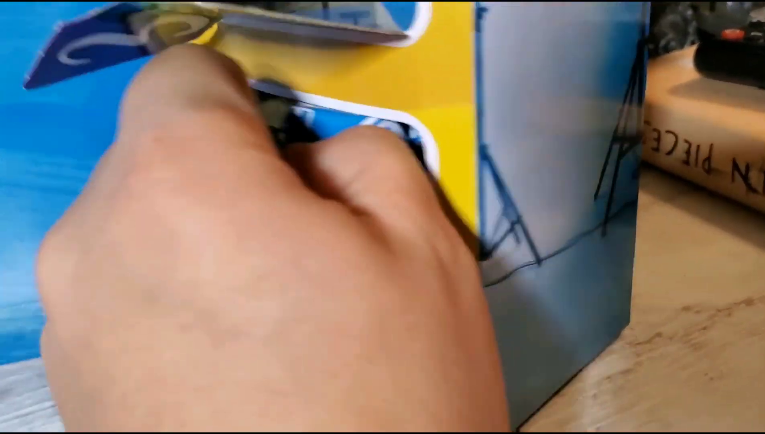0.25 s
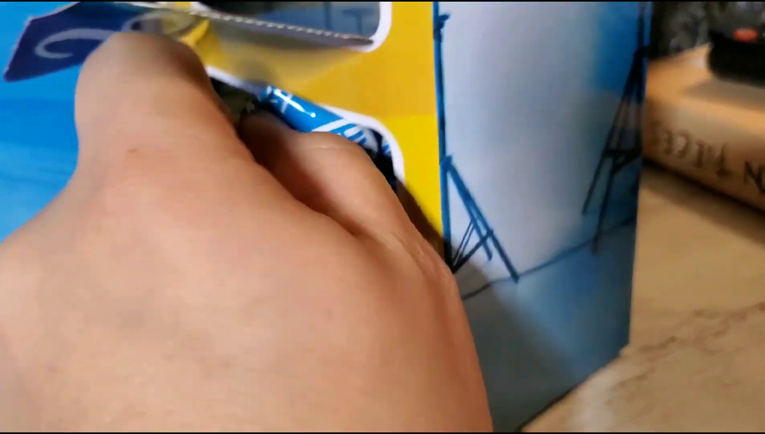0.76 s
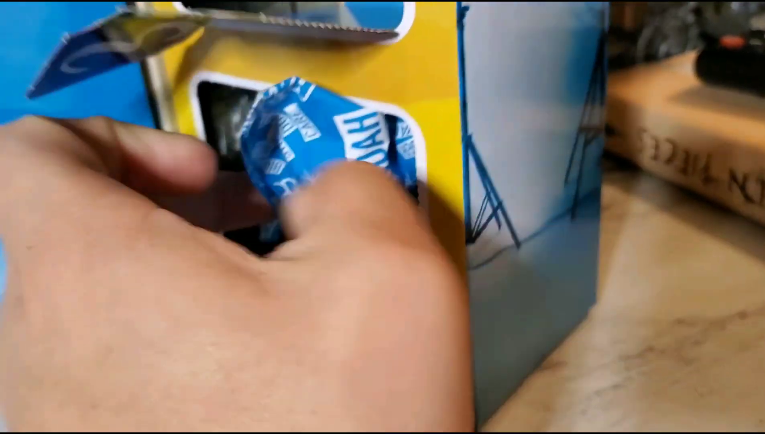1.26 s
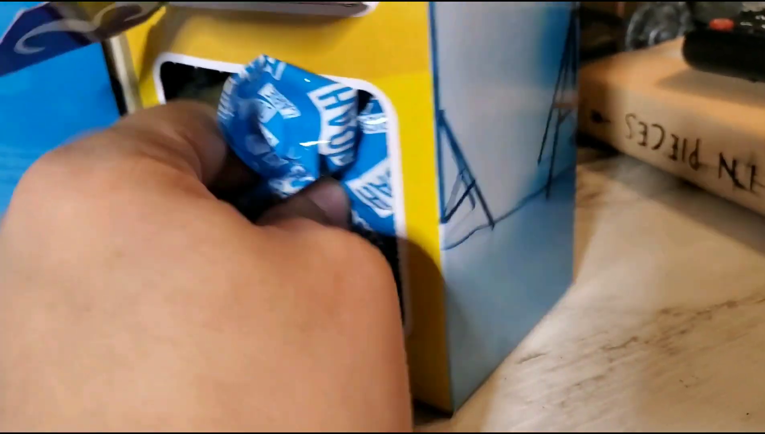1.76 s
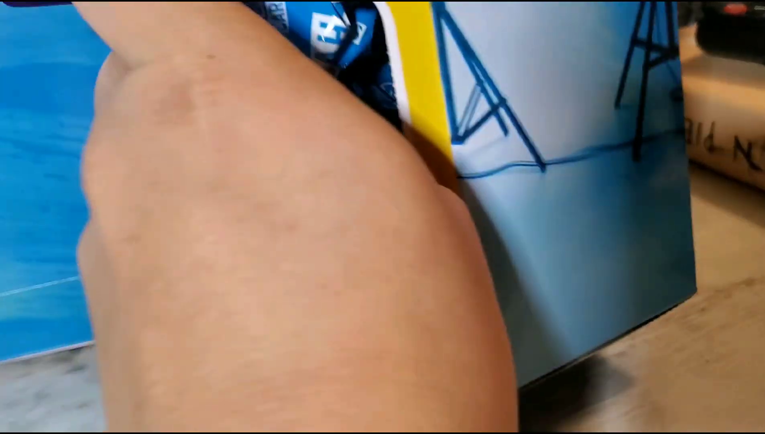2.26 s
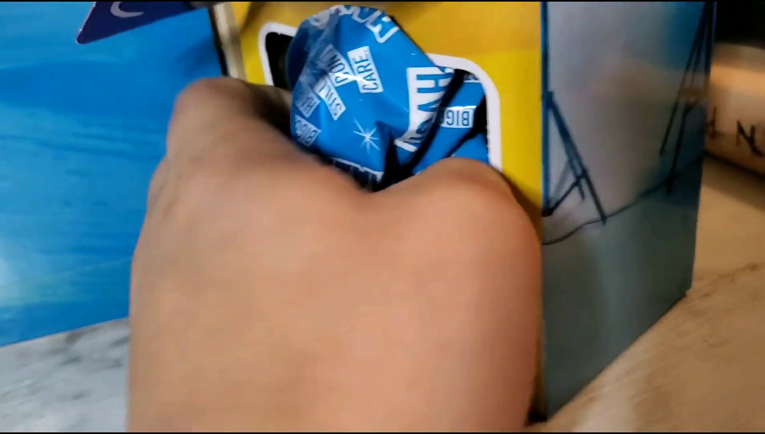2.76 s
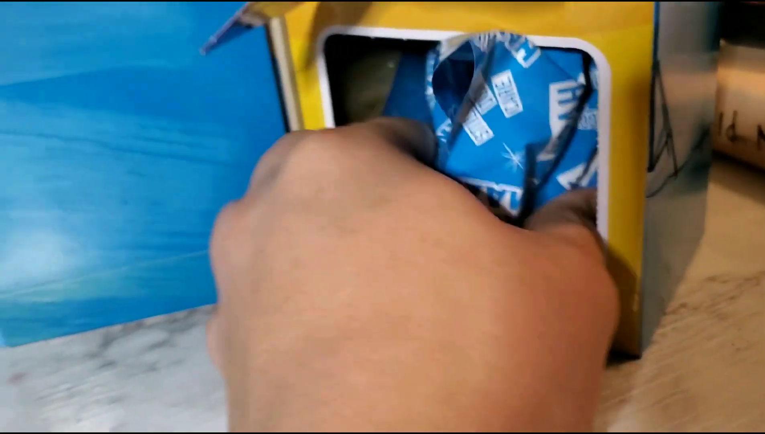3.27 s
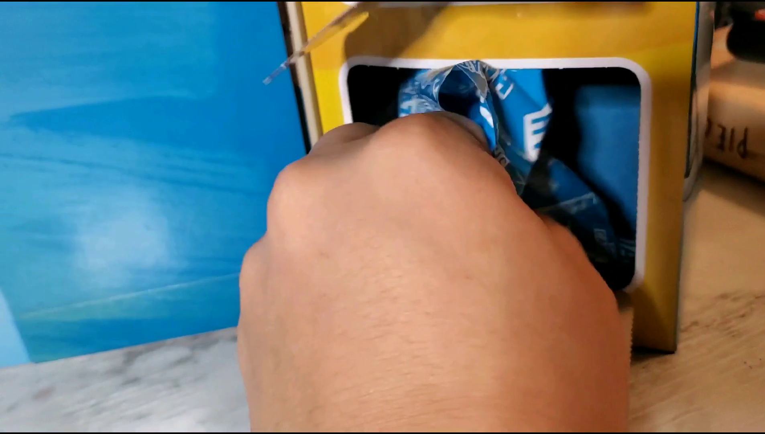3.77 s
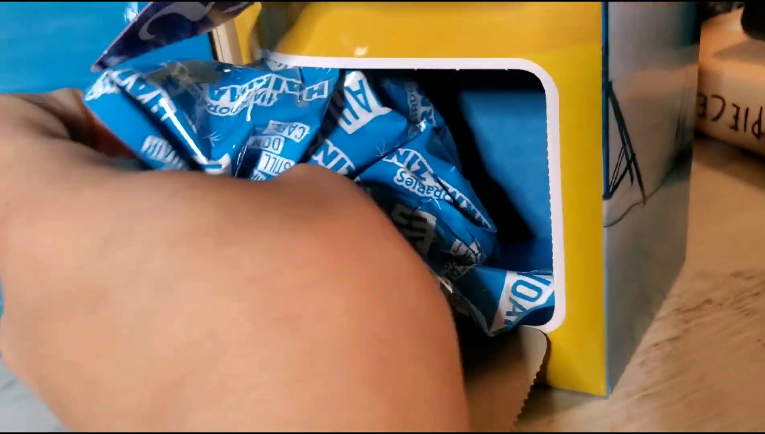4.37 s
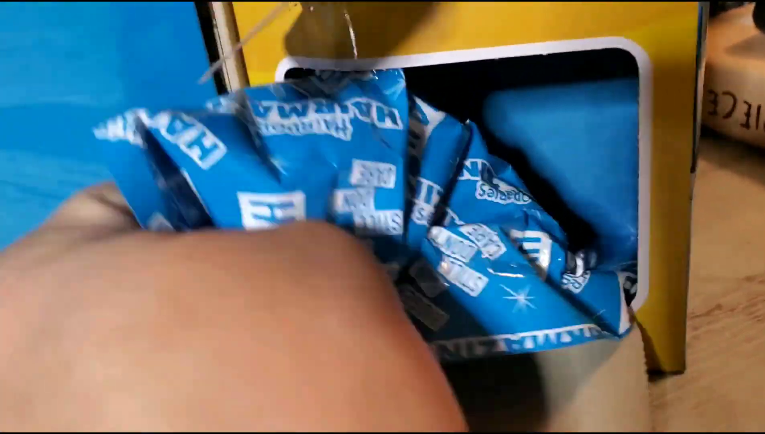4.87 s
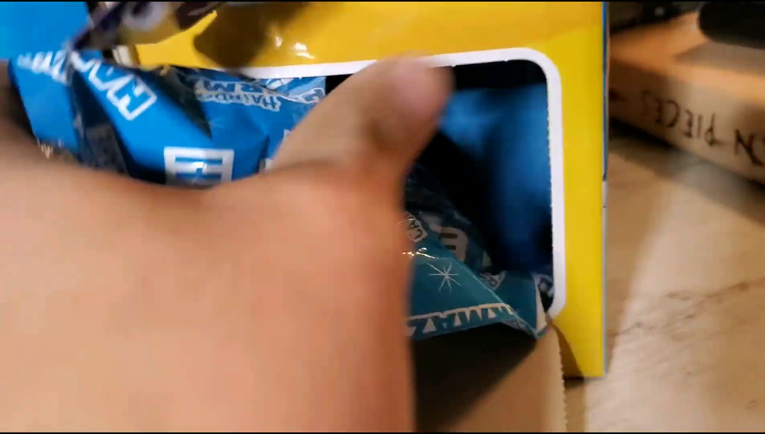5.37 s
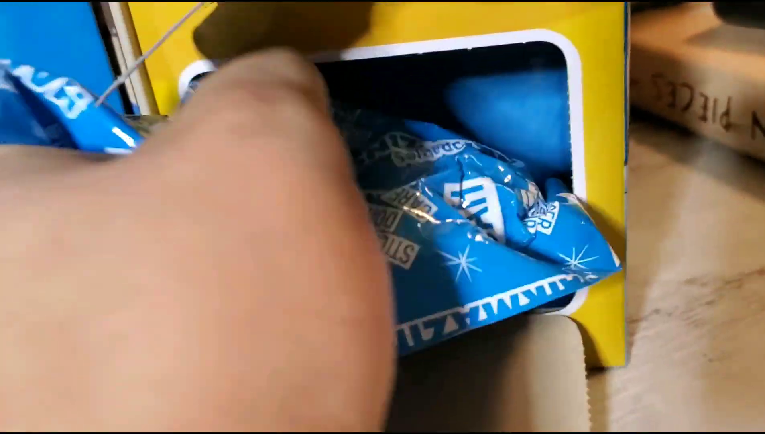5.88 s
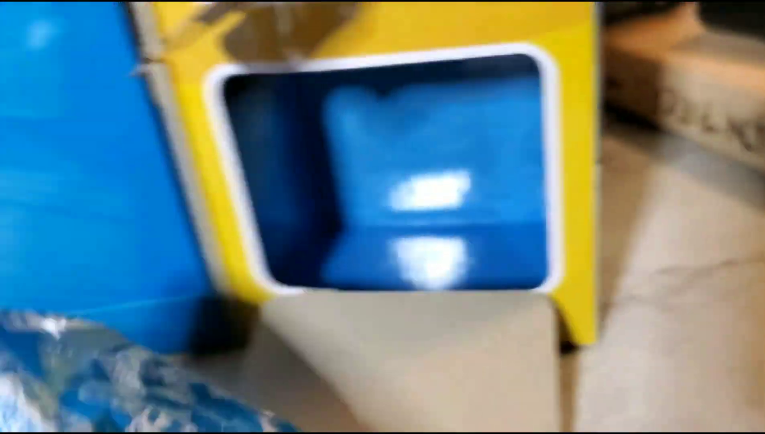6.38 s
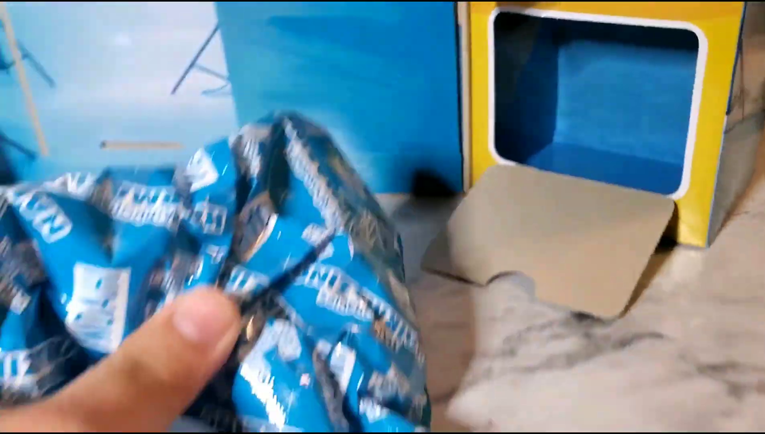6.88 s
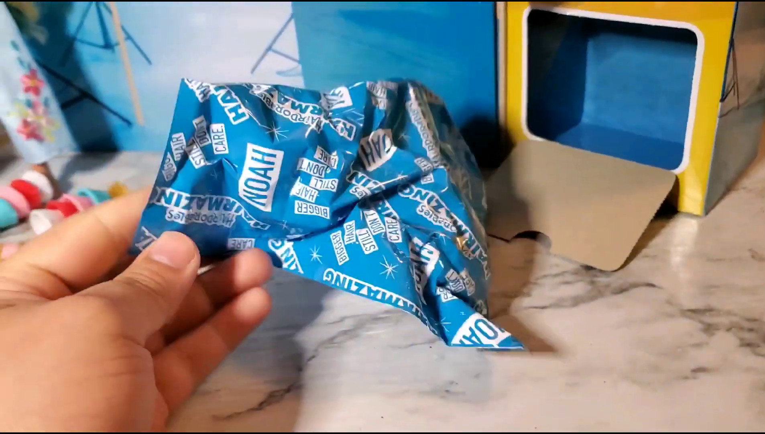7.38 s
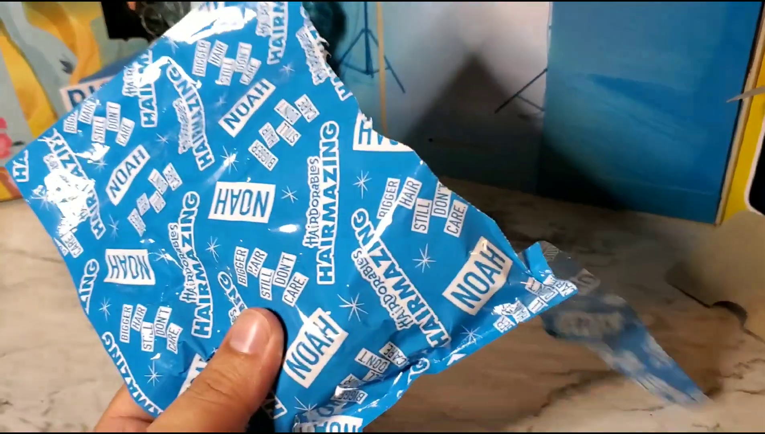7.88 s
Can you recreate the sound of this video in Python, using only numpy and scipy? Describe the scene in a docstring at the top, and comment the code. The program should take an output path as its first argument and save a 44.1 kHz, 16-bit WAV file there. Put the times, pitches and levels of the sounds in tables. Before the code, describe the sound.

A close, detailed sound of a foil packet being worked out of a cardboard box in a small, quiet furnished room, with a faint low rumble and hum throughout. From 0 to 2.5 s the creases are dull, muffled and scattered, with small pops and quiet gaps. At about 2.5 s the foil turns brighter and stronger; film rubs dryly over card, and a hollow double thud with a short falling groan comes near 2.9 s. It eases around 3.5 to 4 s, with scraping and soft card flexing. Between 4 and 6 s snaps crowd into dense, crisp crackling, thickest around 4.6 and 5.1 s, with light box bumps. The loudest crack strikes near 6.65 s, followed by a cluster of sharp pops until 6.85 s. From 7 s to about 8.1 s only sparse, light crinkles remain.

```python
"""Fingers work a foil packet out of a cardboard box, close by, in a quiet furnished room with a low hum throughout.
Dull, scattered creases come first; from about 2.5 s the foil is brighter, card is rubbed and the box thuds and groans.
Snaps crowd together between 4 and 6 s, the loudest crack falls near 6.65 s, and sparse crinkles close the scene.
Foil is jolts and scattered ringing, rubbing is shaped noise, and the box is a set of decaying resonances.
A falling resonance makes each groan; delayed copies, a diffuse noise tail and steady rumble make the room."""
import sys
import numpy as np
from scipy import signal
from scipy.fft import rfft, irfft
from scipy.io import wavfile
from scipy.ndimage import uniform_filter1d

SR = 44100
rng = np.random.default_rng(int(sys.argv[2]) if len(sys.argv) > 2 else 0)


def to_wav(s):
    """Save 16-bit WAV."""
    ch = np.atleast_2d(s).T  # columns
    pcm = np.round(np.clip(ch, -1, 1) * 32767)  # PCM
    wavfile.write(sys.argv[1], SR, pcm.astype(np.int16))


N = 358533
TIME = np.arange(N) / SR
RING_TIME = np.arange(2048) / SR

# All table levels are relative dB; the functions scale them further.
# Large creases that buckle. Each row: start in seconds, crack level in dB, panel ring level in dB,
# crisp edge level in dB, facet pitch in Hz.
CREASE_SNAPS = [(0.0896, -40, -38, -72, 1355), (0.2383, -22, -23, -52.5, 1344),
                (0.2486, -33.5, -25, -63, 1130), (0.3092, -28.5, -29, -55.5, 1405),
                (0.3324, -40, -33.5, -67, 1480), (0.3688, -34, -33, -48.5, 1410),
                (0.3957, -38, -39, -51, 1160), (0.477, -47, -34.5, -62, 1240),
                (0.4999, -41, -39, -56.5, 1340), (0.521, -49, -38.5, -49, 1140),
                (0.686, -47, -34, -59, 1230), (0.7018, -38, -29, -53, 1140), (0.7947, -52, -31, -70, 1320),
                (0.81, -29.5, -30, -47, 1206), (0.8195, -29, -30, -45, 1330), (0.8348, -35, -39, -53, 1360),
                (0.871, -37, -48, -63, 1390), (0.9904, -65, -35, -65, 1650),
                (1.0554, -37.5, -38, -55, 1371), (1.1604, -31, -29.5, -45.5, 1220),
                (1.1854, -45, -48, -63, 1185), (1.3119, -46, -37, -76, 1285),
                (1.5834, -61, -40.5, -51, 1380), (1.8437, -35.5, -46, -46, 1430),
                (1.8703, -35, -33.5, -48, 1250), (1.8834, -32, -38, -58, 2720),
                (1.918, -28.5, -37.5, -55, 1596), (2.0047, -47, -35.5, -60, 1310),
                (2.0204, -34, -28, -47.5, 1384), (2.5201, -33, -38, -44.5, 1280),
                (2.571, -25.5, -34, -35.5, 2120), (2.5889, -41, -31, -40.5, 1350),
                (2.6554, -29, -29.5, -39.5, 1200), (2.6594, -22, -25.5, -36.5, 1345),
                (2.7308, -25, -34.5, -38.5, 1420), (2.842, -33, -30.5, -52, 1420),
                (2.8663, -33, -22, -41.5, 1300), (2.9552, -28, -26.5, -43, 1266),
                (3.0341, -32, -30.5, -52, 1400), (3.0721, -21, -33, -35.5, 1668),
                (3.1011, -29, -32, -48, 1430), (3.1474, -26, -34, -54.5, 1450),
                (3.3062, -34, -30.5, -73.5, 1300), (3.3318, -29.5, -32, -63, 1410),
                (3.3978, -27, -42, -49, 1290), (3.61, -38, -30, -71, 1650), (3.708, -31, -36.5, -54, 1220),
                (3.8632, -39, -34, -74, 1410), (4.0592, -26.5, -42, -61, 1450),
                (4.1164, -28, -29.5, -48, 1270), (4.1234, -22, -24.5, -44.5, 1580),
                (4.1844, -29.5, -30.5, -64, 1540), (4.2041, -21, -26.5, -41, 1150),
                (4.2754, -22.5, -27, -46, 1370), (4.3445, -30, -30.5, -58, 1370),
                (4.3911, -31, -34, -60, 1400), (4.472, -24.5, -28.5, -38, 1590),
                (4.511, -31, -27.5, -38.5, 1430), (4.5288, -24, -27, -38.5, 1160),
                (4.5401, -22, -32, -45, 1390), (4.575, -21.5, -28.5, -41, 2890),
                (4.5933, -16, -26.5, -37, 1180), (4.6083, -19, -21.5, -33, 1630),
                (4.6224, -28, -21.5, -45, 1174), (4.6371, -22.5, -32, -35.5, 1550),
                (4.6641, -24, -21, -34.5, 1320), (4.6902, -22, -34, -33, 1330),
                (4.7072, -15.5, -23.5, -37, 1340), (4.7154, -28, -24.5, -35, 1530),
                (4.7336, -23.5, -22, -36.5, 1340), (4.773, -25, -37, -41, 1460),
                (4.798, -30, -39, -37.5, 1500), (4.8254, -31, -41, -36.5, 1210),
                (4.8398, -23, -33, -43, 2440), (4.8494, -24, -27, -38, 1180), (4.8554, -26, -27, -45, 1630),
                (4.8886, -27, -29.5, -38, 1530), (4.9078, -30.5, -44, -38, 2040),
                (4.9447, -31, -47, -44, 1280), (4.964, -51, -44, -46, 1110),
                (5.014, -30, -39.5, -37.5, 1175), (5.03, -23, -39, -37, 1620),
                (5.0424, -26, -34, -36, 1410), (5.0674, -21.5, -29, -33, 2850),
                (5.079, -21, -27.5, -33, 1600), (5.0978, -23, -29.5, -35, 1400),
                (5.1054, -22.5, -25.5, -41, 1320), (5.1794, -29, -36, -38, 1550),
                (5.2231, -23.5, -28.5, -39, 1505), (5.2485, -22.5, -35, -35, 3300),
                (5.2898, -29, -33.5, -39.5, 1910), (5.3154, -25.5, -28, -39, 1320),
                (5.3368, -29, -39, -38.5, 1880), (5.4009, -27, -35, -43, 1910),
                (5.4333, -30, -41.5, -41, 1310), (5.447, -23, -39, -31, 1610),
                (5.4889, -30, -40, -42, 1430), (5.5199, -29, -30.5, -34, 1540),
                (5.5371, -18, -36, -33.5, 1210), (5.6, -26, -42, -35, 1310),
                (5.6471, -28.5, -38, -35.5, 1320), (5.677, -28, -46, -41, 1450),
                (5.6915, -16, -34.5, -29.5, 1420), (5.7097, -23.5, -35.5, -45, 1150),
                (5.7268, -34, -39, -42, 1450), (5.7784, -49, -43, -41, 1410),
                (5.8069, -33, -45, -41.5, 2330), (5.886, -28.5, -43, -51, 1454),
                (6.0033, -28.5, -65, -39, 2090), (6.0532, -38, -31, -43, 1570),
                (6.1901, -29, -38, -41.5, 1206), (6.2209, -31, -64, -38, 1360),
                (6.2745, -30, -34, -41.5, 1450), (6.319, -35, -45.5, -46, 1355),
                (6.36, -32, -38, -40.5, 2020), (6.4416, -46, -38, -46, 1440),
                (6.4881, -32.5, -35.5, -39, 1560), (6.5128, -29, -33, -43, 1250),
                (6.546, -19, -36, -28.5, 1670), (6.6499, -9.5, -12, -29, 1326),
                (6.6973, -22, -25, -37, 1150), (6.7334, -22.5, -33, -33.5, 2310),
                (6.7705, -21, -24, -48, 1110), (6.7787, -18.5, -14, -32, 1940),
                (6.786, -20, -18, -27, 1150), (6.8019, -20, -22, -32, 1390),
                (6.8298, -20.5, -22, -35.5, 1630), (6.9419, -39, -39.5, -60, 1360),
                (7.0748, -38, -40.5, -63, 1330), (7.0863, -31, -66, -48, 1890),
                (7.1771, -27, -63, -41, 1720), (7.2903, -31.5, -56, -57, 1710),
                (7.4435, -24.5, -49, -41.5, 2470), (7.4611, -35, -50, -48, 1240),
                (7.502, -28, -59, -65, 1890), (7.5571, -35.5, -54, -46.5, 1410),
                (7.6892, -39.5, -38.5, -68, 1460), (7.7509, -31.5, -48, -52, 1540),
                (7.7929, -34, -51, -68, 1356), (8.003, -38, -53, -53, 1590),
                (8.1056, -32.5, -42.5, -69.5, 1120)]
# Share of a snap that each register takes, in dB.
SNAP_BODY_DB, SNAP_CRACK_DB, SNAP_EDGE_DB, SNAP_SPARKLE_DB = -2.5, -12, -4, -9.5
# Squeezes of the foil by the fingers. Each row: start in seconds, length in seconds, effort in dB,
# brightness in dB, which is low while the box muffles the foil.
FOIL_GRIPS = [(0.0, 0.23, -60, -9), (0.269, .14, -58, -4.5), (0.488, .07, -58, -10), (0.587, .1, -60, -10),
              (0.67, 0.063, -58, -11), (0.79, 0.077, -53, -10), (0.933, 0.15, -60, -11.5),
              (1.15, .05, -57, -7), (1.28, .08, -62, -11), (1.568, .05, -61, -7), (1.647, .07, -59, -9.5),
              (1.867, 0.069, -58, -2), (2.001, 0.042, -57, -8), (2.145, 0.04488, -69.5, -11.5),
              (2.29, 0.075, -77, -10.5), (2.462, 0.037, -66, -6), (2.508, .16, -50, -5),
              (2.698, 0.083, -51, 0), (2.818, .06, -44.5, -1.5), (2.89, .04, -47, -5.5),
              (2.95, .21, -47, 0), (3.179, .1, -62, -2.5), (3.294, 0.07887, -50, -6.5),
              (3.418, 0.11, -52, -5), (3.496, .06, -50, -6.5), (3.595, 0.18, -55.5, -6.5),
              (3.855, 0.17, -56, -7.5), (4.114, .1, -48.5, -7), (4.26, .08, -61, -6.5),
              (4.38, .06, -51, -9), (4.478, .24, -41, -3.5), (4.801, .09, -47, -2.5),
              (4.921, 0.069, -53, -1.5), (5.029, .09, -42, 0.5), (5.139, .13, -50, 0),
              (5.31, .07, -53.5, -5), (5.408, .06, -47, -3), (5.509, .12, -46, -0.5), (5.684, .09, -47, 0),
              (5.79, .05, -62.5, -9), (5.919, 0.072, -55.5, -2), (5.981, .12, -50.5, -2.5),
              (6.169, 0.25, -53, -4), (6.428, 0.19, -46, -0.5), (6.642, .1, -44, -4.5),
              (6.77, 0.07, -42, -2.5), (6.888, .15, -62.5, -5), (7.112, 0.0641, -53, -1),
              (7.272, .04, -62, 1.5), (7.385, 0.057, -54.5, -3.5), (7.45, 0.087, -52, 1),
              (7.681, .11, -60, -5.5), (7.964, .17, -62.5, 0.5)]
# Slopes of every hand stroke, and the hand at rest on the foil.
ATTACK_DB_PER_S, SAG_DB_PER_S, RELEASE_DB_PER_S = 698, 10, 357
REST_DB, REST_BRIGHTNESS_DB = -84, -16
# A brighter grip trades panel body for crisp edge; sparkle fades out below the knee.
BODY_LOSS_PER_DB, EDGE_GAIN_PER_DB, EDGE_DB, SPARKLE_KNEE_DB = 1.19, 1.02, -8.5, -60.5
# Scatter in strength of the tiny buckles from register to register.
COLOUR_SCATTER_DB = 3.5
# Colours of the four foil registers, lowest first. Each row: frequency in Hz, level in dB.
BODY_COLOUR = [(200, -22), (300, -17), (380, -14.5), (520, -4.5), (720, 2), (930, -2), (1150, -12),
               (1500, -29.5)]
CRACKLE_COLOUR = [(850, -13.5), (1200, 2.5), (1650, 4), (2200, -1), (2900, -7), (3700, -12.5), (5000, -20)]
EDGE_COLOUR = [(2900, 3), (3900, 3.5), (5500, 4), (7000, 0.5), (8500, -5.5), (10500, -13)]
SPARKLE_COLOUR = [(7000, -11.5), (8800, -4), (10200, -8.5), (12500, -14), (15000, -11), (15800, -23.5)]
# Film and skin slide on the cardboard. Each row: start in seconds, length in seconds, level in dB.
CARD_SLIDES = [(0.085, 0.042, -51.5), (0.988, 0.095, -66), (0.62, .12, -65), (1.68, 0.13, -67),
               (2.53, 0.23, -45.5), (2.786, 0.32, -48.5), (3.44, 0.094, -47.5), (3.58, 0.42, -53),
               (4.37, 0.14, -45), (4.8, 0.14, -47.5), (5.1, 0.4, -50), (5.97, 0.42, -48), (6.38, .17, -42),
               (7.14, 0.056, -45), (7.3, 0.31, -56.5), (7.724, 0.058, -68)]
# Colour of that sliding. Each row: frequency in Hz, level in dB.
SLIDING_COLOUR = [(1400, 7), (1800, -0.5), (2100, 12), (2600, -4), (3100, 10), (3600, -4), (4200, 1.5),
                  (4700, -4), (5300, 3.5), (6200, -4), (7000, -42), (10000, -28), (15000, -41)]
# First bounces off the table and the box. Each row: delay in seconds, level in dB.
NEAR_BOUNCES = [(.0027, -41), (.0046, -25), (.0073, -35), (.0109, -18)]
# How firmly the foil bears on the box. Each row: time in seconds, level in dB.
FOIL_CONTACT = [(0, -8), (1.3, -3.5), (2.5, -18.5), (3.8, -3), (4.3, -23.5), (5.8, -4.5), (6.7, -21),
                (7.1, -12), (8.13, -14)]
# Modes of the box walls and cavity. Each row: frequency in Hz, level in dB, 60 dB decay time in seconds.
BOX_WALL_MODES = [(512.8, 10.5, 0.12), (622, 4.5, 0.034), (754, 4, 0.054), (950, -18, 0.22),
                  (1500, -5.5, 0.034)]
# Bumps against the box. Each row: start in seconds, peak level in dB.
BOX_BUMPS = [(2.895, -25.5), (2.908, -17.5), (4.119, -34), (4.474, -43), (4.6, -26), (5.521, -34),
             (6.651, -26.5), (6.788, -24.5)]
# Low modes of a bumped box. Each row: frequency in Hz, level in dB, 60 dB decay time in seconds.
BOX_THUD_MODES = [(105, -16, .05), (144, -2, 0.026), (188, -5, 0.14), (243.6, -9.5, 0.19),
                  (330.5, 2.5, 0.06), (387, 3.5, 0.027)]
# The box is dragged. Each row: start in seconds, length in seconds, level in dB.
BOX_DRAGS = [(0.0, 0.11, -56), (0.8, 0.49, -65.5), (2.223, 0.18, -64.5), (2.721, 0.37, -66),
             (3.475, 0.29, -54), (3.92, 0.18, -60.5), (4.456, .22, -51), (4.72, 0.29, -58),
             (5.294, .35, -58), (5.745, 0.22, -61.5), (6.085, 0.84, -58), (6.662, 0.067, -42),
             (7.42, 0.056, -56), (7.684, 0.067, -56.5)]
# The box also judders with every squeeze of the foil, at this level beside the grip.
JUDDER_FOLLOWS_DB = -16.5
# A flap of card bends and sags. Each row: start in seconds, length in seconds, first pitch in Hz,
# last pitch in Hz, level in dB.
FLAP_FLEXES = [(2.892, 0.068, 471, 179.1, -41), (3.525, 0.084, 248, 163, -48),
               (3.724, 0.053, 268, 206, -48.5), (4.109, 0.041, 232, 183, -37.5),
               (4.842, 0.07, 616.4, 373, -42.5), (4.886, 0.072, 377, 137, -50),
               (5.074, 0.038, 217, 142.9, -44.5), (5.76, 0.1, 520, 305, -60), (6.797, 0.04, 402, 337, -40)]
# Decay of the room. Each row: frequency in Hz, 60 dB decay time in seconds.
ROOM_DECAY = [(150, 0.29), (600, 0.13), (2000, 0.21), (5000, 0.15), (10000, 0.05), (16000, 0.36)]
# Colour of the still room. Each row: frequency in Hz, level in dB.
STILL_AIR_COLOUR = [(20, -9.5), (33, -12.5), (42, 1), (53, 7), (75, -5.5), (120, -9), (200, -20),
                    (400, -20.5), (700, -22), (1400, -28), (2500, -56.5), (5000, -47.5), (9000, -62),
                    (16000, -66)]
CUTOFF_HZ = 16100


def foil():
    """Shared excitation: the same buckles sound in all four registers; hard handling favours the highest."""
    _, crack_db, panel_db, edge_db, pitch_hz = np.transpose(CREASE_SNAPS)
    body = gripping(-BODY_LOSS_PER_DB)
    crackle = gripping(0)
    edge = from_db(EDGE_DB) * gripping(EDGE_GAIN_PER_DB)
    sparkle = edge * edge / (edge + from_db(SPARKLE_KNEE_DB))
    jolts = tiny_buckles(crackle, per_s=280, spread_db=4)
    shapes = facets(pitch_hz, t60=0.042, flutter=5.2, late_db=-11.5, late_t60=0.033,
                    tone=5.66, overtone=3.3, cycles=43)
    return (register(BODY_COLOUR, shapes, panel_db + SNAP_BODY_DB, body, jolts,
                     crinkle_db=0.0, rub_db=-6.5)
            + register(CRACKLE_COLOUR, shapes, crack_db + SNAP_CRACK_DB, crackle, jolts,
                       crinkle_db=0.5, rub_db=-12)
            + register(EDGE_COLOUR, shapes, edge_db + SNAP_EDGE_DB, edge, jolts,
                       crinkle_db=2.2, rub_db=-13.5)
            + register(SPARKLE_COLOUR, shapes, edge_db + SNAP_SPARKLE_DB, sparkle, jolts,
                       crinkle_db=-2.0, rub_db=-32))


def register(spectrum, shapes, snap_db, effort, jolts, crinkle_db, rub_db):
    """Superposition in one register: snaps, fine crinkles and the hiss of film on film."""
    click = click_of(spectrum)
    sounds = heard_in(shapes, click)
    scatter_db = COLOUR_SCATTER_DB * np.clip(rng.standard_normal(N), -2, 2)
    colour = rms_one(from_db(scatter_db))
    fine = from_db(crinkle_db) * crinkles(jolts * colour, sounds)
    rub = from_db(rub_db) * coloured(rng.standard_normal(N), click)
    return snaps(sounds, snap_db) + effort * (fine + rub)


def facets(pitch_hz, t60, flutter, late_db, late_t60, tone, overtone, cycles):
    """Impulse response of buckling facets: a jolt, then bending waves scatter; one spectrum each."""
    t, count = RING_TIME, len(pitch_hz)
    decay = from_db(-60 * t / t60) + from_db(late_db - 60 * t / late_t60)
    scatter = rng.standard_normal((count, len(t))) * decay
    force = flutter * scatter / np.linalg.norm(scatter, axis=1, keepdims=True)
    force[:, 0] += 1
    # each facet rings briefly at its own pitch, with unrelated overtones in the octaves above
    higher_hz = [lowest * 2 ** rng.random(count) for lowest in (2000, 4000, 8000)]
    for hz, strength in zip([pitch_hz, *higher_hz], [tone, overtone, overtone, overtone]):
        hz = hz[:, None]
        fade = np.exp(-np.log(1000) * t * hz / cycles)   # 60 dB down after this many cycles
        force += strength * hz / SR * np.sin(2 * np.pi * hz * t) * fade
    polarity = rng.choice([-1, 1], (count, 1))
    return rfft(force * polarity, 2 * len(t))


def heard_in(shapes, click):
    """Spectral product, or convolution: facets through one register; unit power over their first 6 ms."""
    size = len(RING_TIME)
    sounds = irfft(shapes * rfft(click, 2 * size))[:, :size]
    sounds = sounds * np.clip(4 * (1 - RING_TIME / RING_TIME[-1]), 0, 1)   # last quarter fades to nothing
    early = sounds[:, :int(.006 * SR)]
    return sounds / np.sqrt(np.mean(early ** 2, axis=1, keepdims=True))


def snaps(sounds, levels_db):
    """Sudden buckling: each large crease rings in a way of its own."""
    out = np.zeros(N)
    for (s, *_), sound, db in zip(CREASE_SNAPS, sounds, levels_db):
        add(out, sound * from_db(db), s)
    return out


def tiny_buckles(effort, per_s, spread_db):
    """Shot noise: random jolts of uneven size, denser under more effort; about unit power."""
    rate = per_s * (effort / effort.mean()) ** 0.33
    sizes = rms_one(from_db(spread_db * np.minimum(rng.exponential(1, N), 3.5)))
    happens = rng.random(N) < rate / SR
    return happens * sizes * np.sqrt(SR / rate)


def crinkles(jolts, sounds):
    """Superposed impulse responses: small jolts are dealt to the same facets at random."""
    sounds = sounds / np.linalg.norm(sounds, axis=1, keepdims=True)
    size = len(RING_TIME)
    out = np.zeros(N + size)
    at = np.flatnonzero(jolts)
    for i, k in zip(at, rng.integers(0, len(sounds), len(at))):
        out[i:i + size] += jolts[i] * sounds[k]
    return out[:N]


def gripping(tilt):
    """Effort-dependent spectrum: a register gains `tilt` dB for each dB of a grip's brightness."""
    start, length, effort_db, brightness_db = np.transpose(FOIL_GRIPS)
    grips = strokes(start, length, effort_db + tilt * brightness_db)
    return np.hypot(grips, from_db(REST_DB + tilt * REST_BRIGHTNESS_DB))


def strokes(start, length, level_db):
    """Exponential envelopes: each hand stroke swells, sags a little and lets go; powers add."""
    t = TIME[::64]
    age, length = t - start[:, None], length[:, None]
    fall_db = (ATTACK_DB_PER_S * np.maximum(-age, 0) + SAG_DB_PER_S * np.clip(age, 0, length)
               + RELEASE_DB_PER_S * np.maximum(age - length, 0))
    gains = from_db(level_db[:, None] - np.minimum(fall_db, 100))
    return np.interp(TIME, t, np.linalg.norm(gains, axis=0))


def sliding(slide_db, grain_db):
    """Stick-slip friction: a dull hiss that catches and slips on the fibres of the card."""
    grain = rms_one(uniform_filter1d(rng.standard_normal(N), size=260))
    rough = rng.standard_normal(N) * from_db(grain_db * grain)
    hiss = coloured(rough, click_of(SLIDING_COLOUR))
    return from_db(slide_db) * strokes(*np.transpose(CARD_SLIDES)) * rms_one(hiss)


def with_bounces(x):
    """Comb interference: delayed copies from nearby surfaces, scaled for their added power."""
    out = x.copy()
    for delay, db in NEAR_BOUNCES:
        add(out, from_db(db) * x, delay)
    return out / np.sqrt(1 + sum(from_db(2 * db) for _, db in NEAR_BOUNCES))


def box_ring(packet, ring_db):
    """Forced resonance: the foil shakes the cardboard that it touches."""
    s, contact_db = np.transpose(FOIL_CONTACT)
    drive = packet * from_db(np.interp(TIME, s, contact_db))
    return from_db(ring_db) * sum(from_db(db) * ring(drive, hz, t60) for hz, db, t60 in BOX_WALL_MODES)


def box_thuds(bump_db, drag_db):
    """Modal excitation: bumps strike each low mode with a new strength; dragging judders in small slips."""
    bumps = np.zeros(N)
    for hz, mode_db, t60 in BOX_THUD_MODES:
        clicks = np.zeros(N)
        for s, db in BOX_BUMPS:
            add(clicks, from_db([db + mode_db + bump_db + rng.normal(0, 1.9)]), s)
        bumps += ring(clicks, hz, t60)
    slips = rng.standard_normal(N) * (rng.random(N) < 300 / SR)   # about 300 a second
    judder = np.zeros(N)
    # judder skips the lowest mode, halves the decay times and alternates the signs
    for k, (hz, db, t60) in enumerate(BOX_THUD_MODES[1:]):
        judder += from_db(db) * ring(slips, hz, t60 / 2) * (-1) ** k
    follow = from_db(JUDDER_FOLLOWS_DB) * gripping(-BODY_LOSS_PER_DB)
    drag = np.hypot(strokes(*np.transpose(BOX_DRAGS)), follow)
    thuds = bumps + from_db(drag_db) * drag * rms_one(judder)
    return signal.sosfilt(signal.butter(2, 1200, fs=SR, output="sos"), thuds)


def card_flexes(width_hz):
    """Falling stiffness: friction excites a resonance that falls as the card goes slack."""
    out = np.zeros(N)
    for s, length, from_hz, to_hz, db in FLAP_FLEXES:
        hz = np.geomspace(from_hz, to_hz, int(length * SR))
        noise = rng.standard_normal((2, len(hz)))
        rough = rms_one(uniform_filter1d(noise, size=int(SR / width_hz), mode="wrap"))
        phase = 2 * np.pi * np.cumsum(hz) / SR
        groan = rms_one(rough[0] * np.sin(phase) + rough[1] * np.cos(phase))
        add(out, from_db(db) * groan * signal.windows.tukey(len(hz), .5), s)
    return signal.sosfilt(signal.butter(4, 900, fs=SR, output="sos"), out)


def room(x, tail_db):
    """Diffuse reverberation: each band's energy arrives a little late and dies away at its own pace."""
    white = rng.standard_normal((2, N))
    tail, late = 0, int(0.0065 * SR)
    edges = np.geomspace(130, 17000, 10)
    for k, (low, high) in enumerate(zip(edges, edges[1:])):
        band = signal.butter(2, [low, high], "band", fs=SR, output="sos")
        # -120 because this gain keeps energy, not amplitude
        keep = from_db(-120 / (SR * at_hz(ROOM_DECAY, np.sqrt(low * high))))
        energy = signal.lfilter([1 - keep], [1, -keep], signal.sosfilt(band, x) ** 2)
        envelope = np.sqrt(np.pad(energy, (late, 0))[:N])
        tail = tail + envelope * rms_one(signal.sosfilt(band, white[k % 2]))
    return from_db(tail_db) * tail


def still_room(air_db, hum_hz, hum_db):
    """Stationary background: low rumble as shaped noise and a faint hum as one sine."""
    air = rms_one(coloured(rng.standard_normal(N), click_of(STILL_AIR_COLOUR, size=16384)))
    hum = np.sin(2 * np.pi * hum_hz * TIME)
    return from_db(air_db) * air + from_db(hum_db) * hum


def from_db(db):
    """Logarithmic level: decibels to amplitude gain."""
    return 10 ** (np.asarray(db) / 20)


def rms_one(x):
    """Normalisation: scale to unit power."""
    return x / np.sqrt(np.mean(x ** 2) + 1e-20)


def at_hz(points, hz):
    """Logarithmic pitch: read a table on a log-frequency axis."""
    f, value = np.transpose(points)
    return np.interp(np.log(np.maximum(hz, 1)), np.log(f), value)


def add(out, sound, s):
    """Superposition: mix a sound in at a time in seconds."""
    start = int(np.clip(s * SR, 0, N - 1))
    out[start:start + len(sound)] += sound[:N - start]


def ring(x, hz, t60):
    """Damped resonance: a unit click sets a decaying sine of height 1 ringing."""
    r, w = from_db(-60 / (t60 * SR)), 2 * np.pi * hz / SR
    return signal.lfilter([0, np.sin(w)], [1, -2 * r * np.cos(w), r * r], x + 1e-18)


def click_of(spectrum, size=2048):
    """Minimum phase: the sharpest causal click of a colour, steeply falling outside it; unit energy."""
    hz = np.maximum(np.arange(size // 2 + 1) * SR / size, 1)
    octaves_outside = np.abs(np.log2(hz / np.clip(hz, spectrum[0][0], spectrum[-1][0])))
    level_db = at_hz(spectrum, hz) - np.minimum(36 * octaves_outside, 70)
    cepstrum = irfft(np.log(from_db(level_db)))
    cepstrum[size // 2:] = 0   # folding the cepstrum makes the click causal
    return rms_one(irfft(np.exp(rfft(2 * cepstrum)))) / np.sqrt(size)


def coloured(x, click):
    """Linear filtering: convolve a signal with a click's colour."""
    return signal.oaconvolve(x, click)[:len(x)]


def scene():
    """Superposition of direct sound, reverberation and background: packet and box in the room."""
    packet = with_bounces(foil() + sliding(slide_db=-5.5, grain_db=7.5))
    box = box_ring(packet, ring_db=-48) + box_thuds(bump_db=-9.5, drag_db=-0.5) + card_flexes(width_hz=76.5)
    near = packet + box
    background = still_room(air_db=-54.5, hum_hz=50.0, hum_db=-65.0)
    return (near + room(near, tail_db=-13.5) + background)[None]


def record(dry):
    """Band limiting: a steep low-pass cuts the top."""
    return signal.sosfilt(signal.ellip(10, .1, 80, CUTOFF_HZ, fs=SR, output="sos"), dry)


dry = scene()
out = record(dry)
to_wav(out)
```